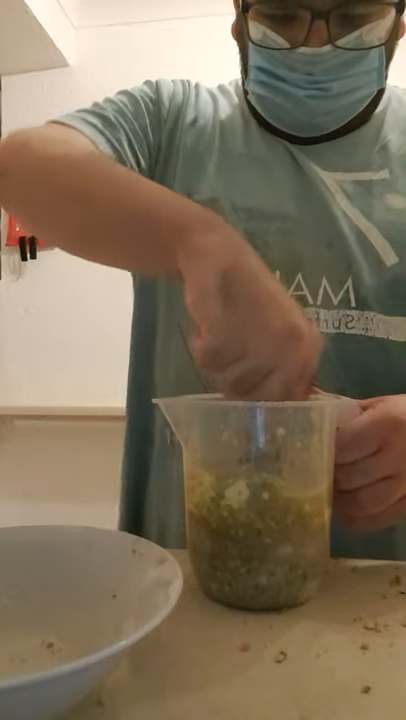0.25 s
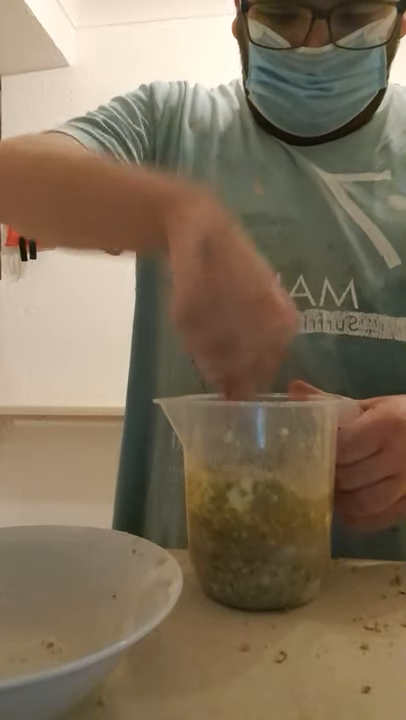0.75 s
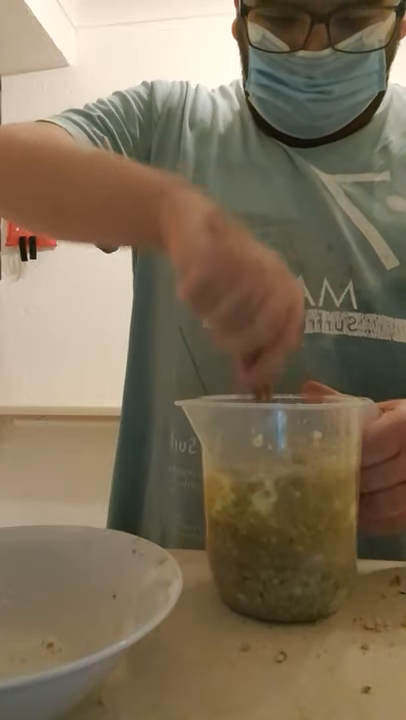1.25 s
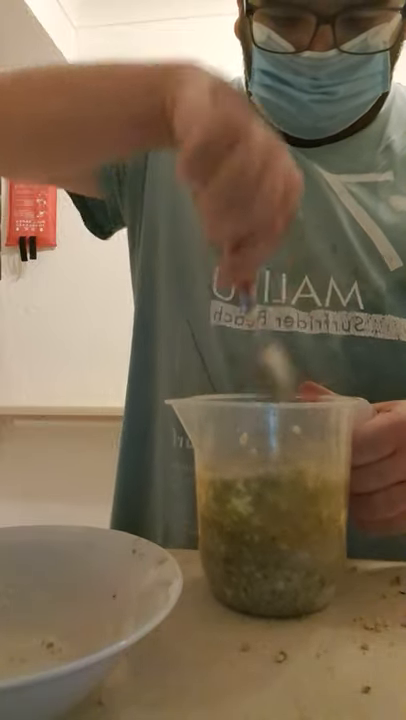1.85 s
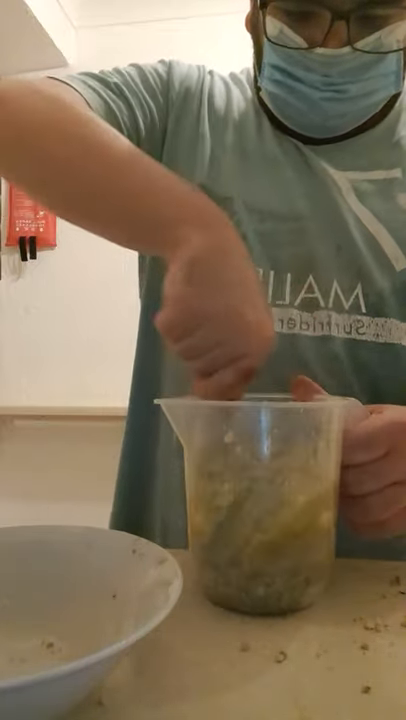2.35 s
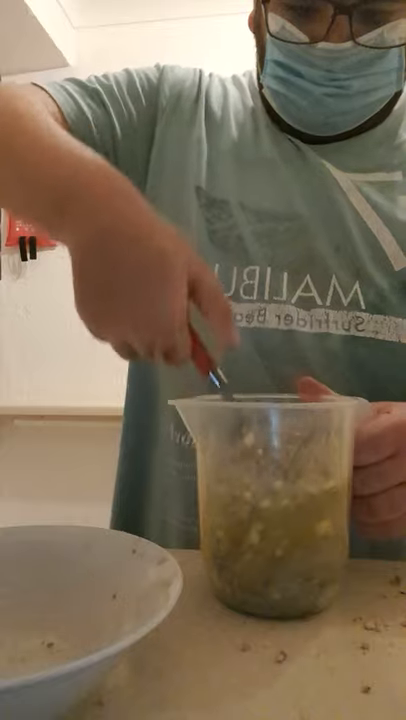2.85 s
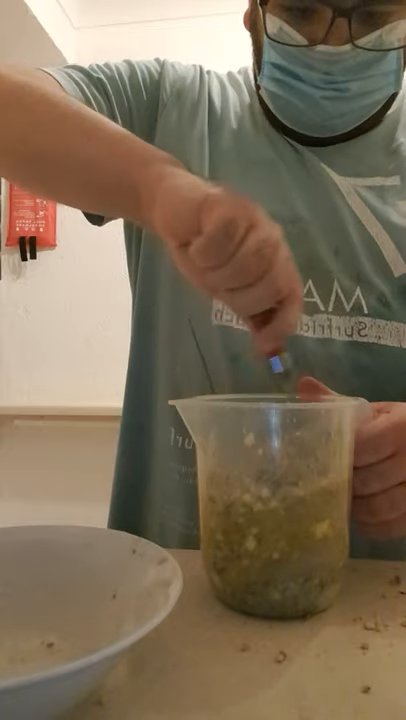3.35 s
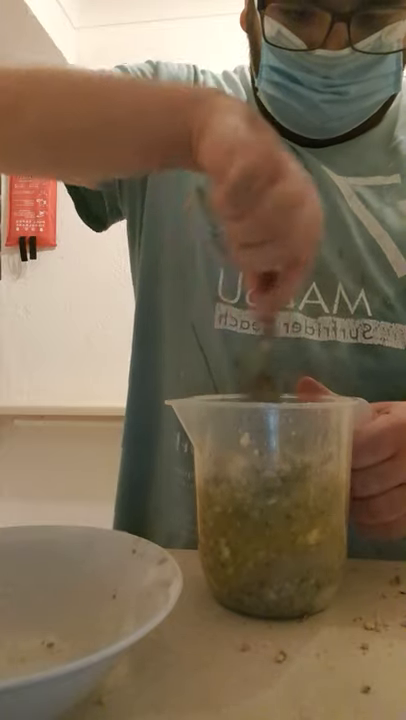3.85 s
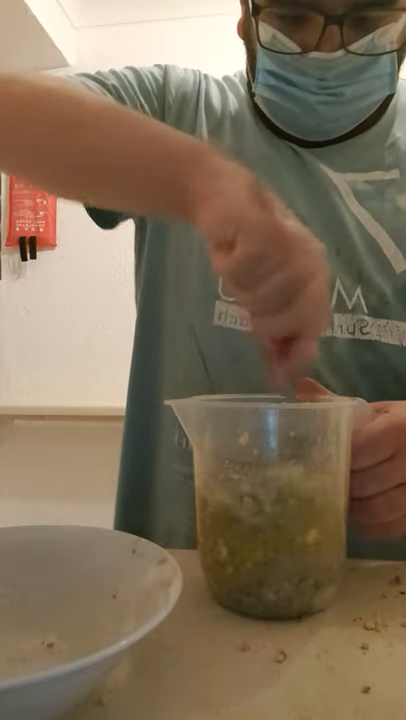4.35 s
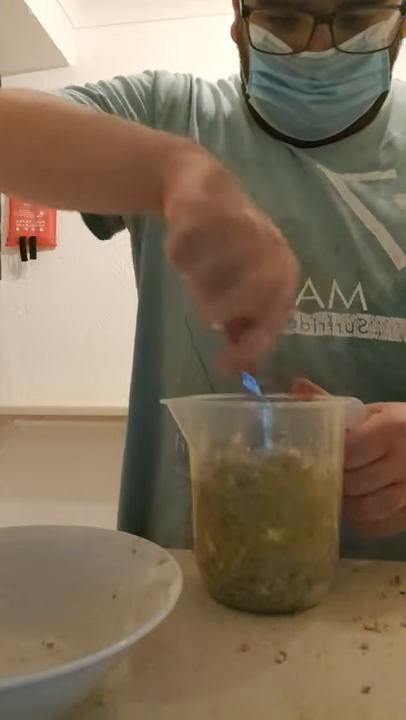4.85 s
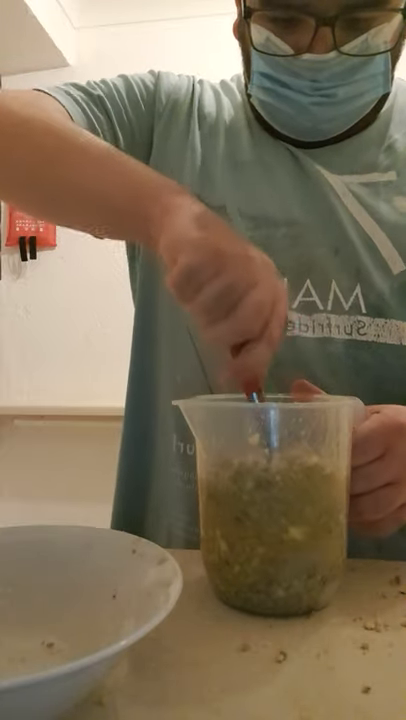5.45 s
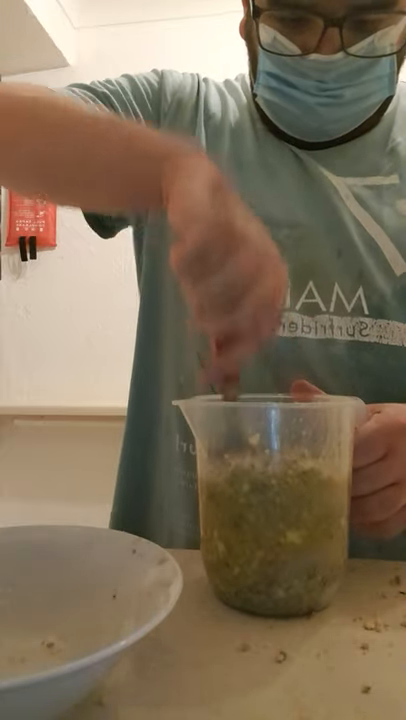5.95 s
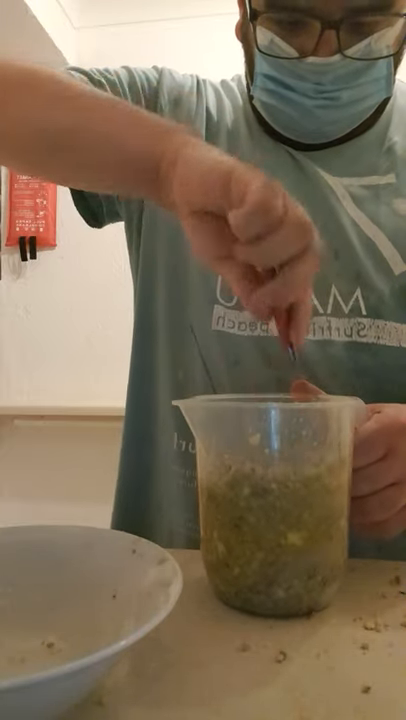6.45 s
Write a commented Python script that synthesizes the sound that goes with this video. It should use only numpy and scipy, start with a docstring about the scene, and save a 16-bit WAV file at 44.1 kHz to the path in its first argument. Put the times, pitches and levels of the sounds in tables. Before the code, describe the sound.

Close up, a metal spoon is driven four times into a wet, grainy mixture in a plastic jug, each plunge crunching and ending in a dull knock that booms the counter. Then it clatters and scrapes on the wall, pauses, and plunges four more times amid ticks and wet slips. Small reflective kitchen, low hum, faint hiss and thin whine behind.

```python
"""Crunching plunges and dull knocks: a metal spoon works a moist, grainy mixture in a plastic jug, close by.
Noise grits and impulses excite the jug ring; each plunge pushes in, crunches and sloshes on the way back.
Between plunges the spoon scrapes, ticks and taps the wall; blows also boom through the kitchen counter.
Near reflections and dense noise tails make the small hard room.
Behind lie a low hum of shaped noise and drones, faint hiss and the thin sine whine of an appliance."""
import sys
import numpy as np
from scipy import signal
from scipy.fft import rfft, irfft
from scipy.io import wavfile

SR = 44100
rng = np.random.default_rng(int(sys.argv[2]) if len(sys.argv) > 2 else 0)


def file_out(sig):
    """Save sig as 16-bit WAV at sys.argv[1]."""
    # one column per channel
    cols = np.atleast_2d(sig).T
    # limit, then scale
    lim = np.clip(cols, -1, 1)
    pcm = np.round(lim * 32767).astype(np.int16)
    wavfile.write(sys.argv[1], SR, pcm)


N = 295911
TIME = np.arange(N) / SR  # s

# Plunges through the mixture: (time at the height [s], crunch [dB], half length [s], treble [dB],
# strongest ring [Hz], slosh on the way back [dB])
PLUNGE_TABLE = [(0.224, -17.5, 0.0051, -4.5, 1270, -59), (.642, -30, 0.0048, -2, 1000, -60),
                (1.073, -26, 0.0063, -8.5, 1090, -50), (1.495, -18.5, 0.0039, -8.5, 1210, -54.5),
                (4.208, -26.5, 0.0052, -13, 958, -55.5), (4.703, -37, 0.0055, -7, 1120, -62),
                (5.161, -29.5, 0.0023, -12, 2250, -54), (5.662, -21, 0.0036, -11, 1361, -53)]
# Blows at the bottom, cushioned by the mixture: (time [s], strength [dB], counter thump [dB],
# room share [dB], corner of the soft blow [Hz], strongest ring [Hz])
KNOCK_TABLE = [(.222, 4, -21.5, 1.5, 764, 247), (0.2351, 2, -47, -4, 1020, 536),
               (.639, 6, -48, -21, 577, 277), (0.6425, 13.5, -15, -6.5, 977, 875),
               (1.071, -5, -26, -3.5, 1180, 418), (1.0995, 14, -21, -4, 1350, 566),
               (1.493, -2, -21, 0, 1345, 980), (4.708, 1.5, -31.5, -4.5, 2280, 735),
               (4.717, 0.5, -42, -20, 2120, 880), (5.1786, 14, -29.5, -1.5, 968, 627),
               (5.662, -3, -26.5, -0.5, 1390, 877)]
# Spoon on the bare wall: (time [s], strength [dB], treble [dB], counter thump [dB], strongest ring [Hz])
TAP_TABLE = [(1.099, -0.5, -11.5, -52, 1330), (1.444, -15.5, -14, -51, 1040), (2.0311, -1, -4, -46, 2794),
             (2.0642, -4, 0, -57, 2430), (2.076, -8, 2, -55, 2400), (2.094, -4, 6, -62, 4400),
             (2.105, 5, -7, -48, 3750), (2.128, -13, -5, -47, 2330), (2.148, -3.5, -21, -31, 2110),
             (2.28, -2.5, -8, -35.5, 2430), (2.331, -7.5, -26, -38, 880), (2.386, -8.5, -9, -54, 1006),
             (2.396, -6, -5.5, -50, 3150), (2.491, 2.5, -12.5, -53, 2660), (2.498, -4.5, -22, -50, 950),
             (2.5215, -3.5, -24, -56, 2600), (2.566, -7, -35, -37, 2270), (4.134, 1.5, -7.5, -41, 2840),
             (4.159, -9, -11, -40, 1198), (4.1728, -7, 4, -45, 2380), (4.183, -9, 7, -44, 2530),
             (4.357, 0, -14, -45, 850), (4.378, 2, -3.5, -39, 1060), (4.484, -7.5, -10, -41, 2670),
             (5.151, -7.5, -15, -30.5, 1000), (6.344, 1.5, -1, -34, 1110), (6.4224, -6.5, -1, -50, 2630)]
# Spoon drawn along the wall: (start [s], length [s], level [dB], treble [dB], strongest ring [Hz])
SCRAPE_TABLE = [(1.597, 0.021, -45, -20, 1000), (2.083, 0.12, -42, -10, 2164), (2.238, 0.23, -46, -12, 910),
                (2.486, 0.17, -46, -9.5, 970), (2.976, 0.15, -59, -5, 2325), (3.557, 0.029, -55, 12, 2500),
                (4.16, 0.13, -51.5, 10, 2490), (4.394, 0.068, -40.5, 3, 2430), (4.596, 0.12, -52, 7, 2473),
                (4.741, 0.084, -44, -1, 2600), (4.973, 0.2, -54, 7.5, 2480), (6.359, 0.12, -58, 0, 995),
                (6.488, 0.058, -46.5, -2, 2260)]
# Rings of the filled jug with the spoon in it: (frequency [Hz], width [Hz], relative level [dB])
JUG_MODES = [(309.4, 35, -7), (409.5, 108, -2), (806, 108, 1), (880, 265, -2.5), (1159, 140, 0.5),
             (1448, 120, -2.5), (1900, 124, -2), (2160, 200, 0), (2546, 170, -0.5), (2880, 210, -2),
             (3100, 950, -10.5), (4600, 210, -24), (5400, 1700, -16.5), (6280, 290, -9)]
# Dry snap of plastic between those rings: (frequency [Hz], relative level [dB])
PLASTIC_SNAP = [(25, -83), (150, -7.5), (550, -6), (1700, -47), (4000, -8.5), (7000, -14), (8000, -22),
                (12000, -14.5), (16000, -22.5)]
# Counter under the jug: (frequency [Hz], relative level [dB], t60 [s])
COUNTER_MODES = [(49.5, -10.5, 0.28), (91.7, -11.5, 0.25), (98.2, 4, 0.15), (143, -3.5, 0.12)]
# Reflections from counter, bowl and wall: (left delay [s], left gain [1], right delay [s], right gain [1])
NEAR_ECHOES = [(.0012, .5, 0.00092, 0.3), (.0033, 0.63, 0.003, 1), (.0052, .4, .0046, .25),
               (.0088, 0.17, 0.011, 0.24)]
# Shading of the left port against the right: (frequency [Hz], level [dB])
LEFT_SHADE = [(100, 7), (300, -13.5), (700, -12.5), (1200, -5.5), (2400, -9.5), (4000, -3), (6500, -12.5),
              (9000, 1), (15000, -7)]
# Room decay: (frequency [Hz], t60 [s])
ROOM_T60 = [(100, 0.53), (300, 0.49), (700, 0.45), (1800, 0.44), (5000, 0.4), (14000, 0.4)]
# Left-right likeness of diffuse sound: (frequency [Hz], likeness [1])
DIFFUSE_LIKENESS = [(60, 0.75), (130, 0.89), (290, 0.99), (640, 0.55), (1400, 0), (15000, 0.28)]
# Diffuse sound, left against right: (frequency [Hz], level [dB])
DIFFUSE_LEAN = [(60, -4), (200, 0), (380, -2.5), (700, -7.5), (2400, -7), (4400, -3), (8000, -5.5),
                (15000, 3)]
# Hum spectrum: (frequency [Hz], relative level [dB per Hz])
HUM_SPECTRUM = [(15, -65), (25, -35), (70, -6), (103, -10), (136, -3), (194, -9.5), (248, -6), (347, -2),
                (386, -13.5), (421, -9.5), (633, -20), (691, -25), (741, -12.5), (869, -20.5), (1700, -36),
                (2210, -71), (3740, -120)]
# Hiss spectrum: (frequency [Hz], relative level [dB per Hz])
HISS_SPECTRUM = [(900, -26), (1700, -3.5), (2600, 1), (3500, -9), (6800, -3), (7700, -18), (10000, -18.5),
                 (12500, -15.5), (16000, -20)]
# Wavering drone notes: (frequency [Hz], relative level [dB])
DRONE_NOTES = [(145.3, -55.5), (247.6, -53.5), (328.4, -56), (732.1, -69.5)]
# Whine lines at speed factor 1: (frequency [Hz], relative level [dB])
WHINE_LINES = [(3634, -81), (3865, -76.5), (4091, -78), (4770, -83), (5227, -77), (5959, -79), (6137, -81),
               (6412, -79), (6589, -73), (7095, -84), (7273, -87)]
# Appliance motor: (time [s], speed factor [1])
MOTOR_SPEED = [(0, 1.0135), (1.0, 1.013), (1.7, 1.0), (4.6, 1.0), (5.3, .9895), (6.71, .9895)]
# Swell and fade of the lowest whine lines: (time [s], gain [dB])
LOW_WHINE_FADE = [(0, 2.5), (.6, -0.5), (1.2, -3), (3, -0.5), (3.9, 2), (4.6, 5), (6.7, -12)]

CRUNCH_SKIRT_S, CRUNCH_SKIRT_DB = 0.021, -22.5  # weak, slower skirt of a crunch
PUSH_DB, PUSH_RISE_S, PUSH_HZ, PUSH_TREBLE_DB, PUSH_CORNER_HZ = -38.5, 0.026, 1040, 1, 1290
ENTRY_DB, ENTRY_RISE_S = -47, 0.024  # wet crackle as the spoon sinks in
LIFT_S, SLOSH_S = 0.14, 0.05  # delay of the slosh after a plunge; its half length
SCRAPE_ATTACK_S, SCRAPE_RELEASE_S = 0.011, 0.02
SMEAR_DB, SMEAR_RELEASE_S = -1.5, 0.054  # wet mixture dragged by a scrape settles more slowly
STIR_DB = -65  # gentle stirring between the strokes
RATTLE_PER_S, RATTLE_DB = 25, -7.5
HUM_DB, DRONE_TRIM_DB = -44.5, -2.0
BAND_EDGE_HZ = 16100


def amp(db):
    """Decibels to gain."""
    return 10 ** (np.asarray(db) / 20)


def unit(x):
    """Scales to rms 1."""
    return x / np.sqrt(np.mean(x ** 2) + 1e-20)


def read(points, hz):
    """Interpolates a table on a log-frequency axis."""
    f, value = np.transpose(points)
    return np.interp(np.log(hz + 1), np.log(f + 1), value)


def add(mix, s, sound):
    """Mixes a sound in at time s."""
    part = mix[max(round(s * SR), 0):][:len(sound)]
    part += sound[:len(part)]


def shaped(x, points):
    """Filters a full-length signal with a (frequency [Hz], level [dB]) table."""
    return irfft(rfft(x) * amp(read(points, np.fft.rfftfreq(N, 1 / SR))), N)


def wander(rate_hz):
    """Slow random motion of rms 1: noise under a Gaussian low-pass."""
    hz = np.fft.rfftfreq(N, 1 / SR)
    return unit(irfft(rfft(rng.standard_normal(N)) * np.exp(-(hz / rate_hz) ** 2), N))


def grit(length, per_s, spread_db):
    """Tiny slips of uneven size at random moments, rms 1."""
    size = amp(spread_db * np.minimum(rng.exponential(1, length), 4))
    happens = rng.random(length) < per_s / SR
    return unit(size * rng.standard_normal(length) * happens)


def jug_ring(spot_hz, spot_db, treble_db=0, corner_hz=None, spot_octaves=0.31, size=8192):
    """Causal jug response: each spot favours one ring; a cushioned blow excites mostly modes below its corner."""
    hz = np.fft.rfftfreq(size, 1 / SR) + 1
    power = amp(read(PLASTIC_SNAP, hz)) ** 2
    for f, width_hz, db in JUG_MODES:
        power = power + amp(db) ** 2 / (1 + ((hz - f) / width_hz * 2) ** 2) ** 1.62
    spot_gain_db = spot_db * np.exp(-(np.log2(hz / spot_hz) / spot_octaves) ** 2)
    treble_gain_db = read([(2500, 0), (9000, treble_db)], hz)
    power = power * amp(spot_gain_db + treble_gain_db) ** 2
    if corner_hz:
        power = power * (amp(-48) ** 2 + 1 / (1 + (hz / corner_hz) ** 6))
    # minimum phase from the log spectrum
    log_gain = np.log(np.r_[power, power[-2:0:-1]]) / 2
    causal = np.exp(np.conj(signal.hilbert(log_gain)))[:len(hz)]
    # bending waves in the wall carry the treble faster than the bass
    delay_s = 0.0008 / np.sqrt(1 + hz / 2500)
    phase = -2 * np.pi * np.cumsum(delay_s) * SR / size
    ring = irfft(causal * np.exp(1j * phase))[:size // 2]
    return -ring / np.linalg.norm(ring)


def plunges(spot_db=8):
    """A muffled push builds up, then a dense crunch swells and dies as the spoon presses through the grains."""
    out, t = np.zeros(N), np.arange(-SR // 10, SR // 10) / SR
    push = amp(PUSH_DB) * np.exp(-abs(t) / PUSH_RISE_S) * (t < 0)
    muffled = jug_ring(PUSH_HZ, spot_db, PUSH_TREBLE_DB, corner_hz=PUSH_CORNER_HZ)
    for s, db, half_s, treble_db, spot_hz, _ in PLUNGE_TABLE:
        skirt = amp(CRUNCH_SKIRT_DB) * np.exp(-abs(t) / CRUNCH_SKIRT_S)
        crunch = amp(db) * (np.exp(-abs(t) / half_s) + skirt)
        bright = jug_ring(spot_hz, spot_db, treble_db)
        for swell, ring in (push, muffled), (crunch, bright):
            force = swell * grit(len(t), per_s=3500, spread_db=2.5)
            add(out, s + t[0], signal.fftconvolve(force, ring))
    return out


def knocks(spot_db=6):
    """Dull cushioned blows at the bottom: returns the near sound and the share thrown into the room."""
    near, far = np.zeros(N), np.zeros(N)
    for s, db, _, room_db, corner_hz, spot_hz in KNOCK_TABLE:
        blow = amp(db) * jug_ring(spot_hz, spot_db, corner_hz=corner_hz)
        add(near, s, blow)
        add(far, s, amp(room_db) * blow)
    return near, far


def taps(chatter_s=0.0019, spot_db=8):
    """Sharp hits; the spoon chatters on the wall for a few milliseconds after each."""
    out, t = np.zeros(N), TIME[:SR // 30]
    for s, db, treble_db, _, spot_hz in TAP_TABLE:
        force = 0.16 * rng.standard_normal(len(t)) * np.exp(-t / chatter_s)
        force[0] = 1
        force = force / np.linalg.norm(force)
        ring = jug_ring(spot_hz, spot_db, treble_db)
        add(out, s, amp(db) * signal.fftconvolve(force, ring))
    return out


def stroke(t, length_s, release_s):
    """Attack, hold and release of one scrape."""
    return np.clip(t / SCRAPE_ATTACK_S, 0, 1) * np.exp(-np.maximum(t - length_s, 0) / release_s)


def scrapes(spot_db=8, clump_db=8):
    """The spoon edge grinds grains against one spot of the wall, in uneven clumps."""
    out, t = np.zeros(N), TIME[:SR // 2]
    clumps = unit(amp(clump_db * np.tanh(wander(rate_hz=42))))
    force = grit(N, per_s=900, spread_db=4.0) * clumps
    for s, length_s, db, treble_db, spot_hz in SCRAPE_TABLE:
        grind = force[round(s * SR):][:len(t)]
        grind = grind * stroke(t[:len(grind)], length_s, SCRAPE_RELEASE_S)
        add(out, s, amp(db) * signal.fftconvolve(grind, jug_ring(spot_hz, spot_db, treble_db)))
    return out


def effort():
    """How hard the mixture is worked: stirring, entry and slosh of each plunge, smear of each scrape, power-summed."""
    power = np.full(N, amp(STIR_DB) ** 2)
    for s, *_, slosh_db in PLUNGE_TABLE:
        power += (amp(ENTRY_DB) * np.exp(-abs(TIME - s) / ENTRY_RISE_S) * (TIME < s)) ** 2
        power += amp(slosh_db) ** 2 * np.exp(-((TIME - s - LIFT_S) / SLOSH_S) ** 2)
    for s, length_s, db, *_ in SCRAPE_TABLE:
        power += (amp(db + SMEAR_DB) * stroke(TIME - s, length_s, SMEAR_RELEASE_S)) ** 2
    return np.sqrt(power)


def drag(pressure, treble_db=0, spot_db=11, count=7):
    """Wet grains stick and slip in clumps at several spots of the wall, and air pockets pop."""
    slip = np.zeros(N)
    for spot_hz in np.geomspace(900, 3300, count):
        clumps = unit(amp(14 * np.tanh(wander(rate_hz=55) - 1)))
        force = grit(N, per_s=2500, spread_db=2.5) * clumps * pressure
        slip += signal.oaconvolve(force, jug_ring(spot_hz, spot_db, treble_db))[:N] / np.sqrt(count)
    return slip + amp(-5) * pops(pressure)


def pops(pressure, per_s=110, cycles=7, count=24):
    """Air pockets in the wet mixture burst as tiny rising chirps of many pitches."""
    out = np.zeros(N)
    for hz in np.geomspace(850, 4200, count):
        age = TIME[:SR // 30] * hz / cycles  # in decay times
        chirp = np.exp(-age) * np.sin(2 * np.pi * cycles * age * (1 + 0.044 * age))
        for at, size in rng.random((round(per_s * N / SR / count), 2)):
            add(out, at * N / SR, pressure[int(at * N)] * amp(13.3 * size ** 2) * chirp)
    return out


def rattle(pressure, treble_db=-3, spot_db=10, spread_db=8, count=4):
    """The spoon skips over grains and ticks at random spots of the wall, louder the harder it rubs."""
    out = np.zeros(N)
    for spot_hz in np.geomspace(1000, 3000, count):
        at, size = rng.random((2, round(RATTLE_PER_S * N / SR / count)))
        force = np.zeros(N)
        force[(at * N).astype(int)] = amp(spread_db * size)
        out += signal.oaconvolve(unit(force) * pressure, jug_ring(spot_hz, spot_db, treble_db))[:N]
    return amp(RATTLE_DB) * out / np.sqrt(count)


def thumps(pressure, rise_s=0.0041, rub_db=-7):
    """Every blow pushes through the jug into the counter, which booms briefly; rubbing makes it rumble."""
    out, t = np.zeros(N), TIME[:SR // 2]
    boom = -sum(amp(db - 60 * t / t60_s) * np.sin(2 * np.pi * hz * t) for hz, db, t60_s in COUNTER_MODES)
    boom = boom * (1 - np.exp(-t / rise_s))
    for s, _, db, *_ in KNOCK_TABLE:
        add(out, s, amp(db) * boom)
    for s, _, _, db, _ in TAP_TABLE:
        add(out, s, amp(db) * boom)
    rub = pressure * rng.standard_normal(N)
    out += amp(rub_db) * signal.oaconvolve(rub, boom / np.linalg.norm(boom))[:N]
    return signal.sosfilt(signal.butter(3, 48, "high", fs=SR, output="sos"), out)


def ports(x, lag_s=0.00014):
    """Each microphone port hears direct sound and near reflections; the left is farther and shaded."""
    left, right = np.zeros(N), x.copy()
    add(left, lag_s, x)
    for left_s, left_gain, right_s, right_gain in NEAR_ECHOES:
        add(left, left_s, left_gain * x)
        add(right, right_s, right_gain * x)
    return np.array([shaped(left, LEFT_SHADE), right])


def pair(a, b, likeness=1):
    """Mixes two unrelated signals into a diffuse stereo field, alike in the bass and leaning right."""
    hz = np.fft.rfftfreq(len(a), 1 / SR)
    same = np.clip(likeness * read(DIFFUSE_LIKENESS, hz), -1, 1)
    left = same * rfft(a) + np.sqrt(1 - same ** 2) * rfft(b)
    return np.array([irfft(left * amp(read(DIFFUSE_LEAN, hz)), len(a)), a])


def kitchen(x, build_s=0.0058, likeness=1.0, count=5):
    """Five dense noise tails, dying sooner in the treble, take turns, each crossfading into the next."""
    out = np.zeros((2, N))
    for k in range(count):
        noise = pair(*rng.standard_normal((2, SR)), likeness)
        hz, t, z = signal.stft(noise, SR, nperseg=256)
        decay = amp(-60 * t / read(ROOM_T60, hz)[:, None])
        tail = signal.istft(z * decay, SR, nperseg=256)[1][:, :SR]
        tail = tail * (1 - np.exp(-(TIME[:SR] / build_s) ** 2))
        tail = tail / np.linalg.norm(tail[1])
        share = np.sin(np.pi / 2 * np.minimum((10 * TIME - k) % count, 2))  # a new tail every 0.1 s
        out += signal.fftconvolve((share * x)[None], tail, axes=1)[:, :N]
    return out


def background(hiss_db=-61.0):
    """Low fan noise and faint hiss from shaped noise, with drone notes wavering in amplitude and phase."""
    air = []
    for a, b in rng.standard_normal((2, 2, N)):
        hum = amp(HUM_DB) * unit(shaped(a, HUM_SPECTRUM))
        hiss = amp(hiss_db) * unit(shaped(b, HISS_SPECTRUM))
        air.append(hum + hiss)
    drone = np.zeros(N)
    for hz, db in DRONE_NOTES:
        slow = wander(rate_hz=3.3) * np.sin(2 * np.pi * hz * TIME)
        fast = wander(rate_hz=11.3) * np.cos(2 * np.pi * hz * TIME)
        drone += amp(db) * (slow + fast)
    return pair(*air) + amp(DRONE_TRIM_DB) * drone


def whine():
    """Thin tones of an appliance motor sink as it slows; at full speed the lowest meets a casing resonance."""
    speed = np.interp(TIME, *np.transpose(MOTOR_SPEED))
    turns = np.cumsum(speed) / SR
    fade_db = np.interp(TIME, *np.transpose(LOW_WHINE_FADE))
    out = np.zeros((2, N))
    for hz, db in WHINE_LINES:
        casing_db = 11 * np.exp(-((hz * speed - 3685) / 30) ** 2)
        level_db = db + 3.5 + 2 * wander(rate_hz=4) + casing_db + fade_db * (hz < 4200)
        start_turn = rng.random((2, 1)) / 2  # per channel
        out += amp(level_db) * np.sin(2 * np.pi * (hz * turns + start_turn))
    return out * amp([[-2], [2]])  # leans right


def scene(tap_room_db=-5.0, plunge_room_db=-8, scrape_room_db=-8, thump_room_db=-7):
    """Sums jug, counter, room and background."""
    pressure = effort()
    knock, far = knocks()
    tap, plunge, thump = taps(), plunges(), thumps(pressure)
    scrape = scrapes() + drag(pressure) + rattle(pressure)
    far = far + amp(tap_room_db) * tap + amp(plunge_room_db) * plunge
    far = far + amp(scrape_room_db) * scrape + amp(thump_room_db) * thump
    near = ports(knock + tap + plunge + scrape) + thump * amp([[-1], [0.5]])
    return near + kitchen(far) + background() + whine()


def record(dry):
    """Applies the microphone's low cut, the full-scale ceiling, then the band limit."""
    thinned = signal.sosfilt(signal.butter(2, 35, "high", fs=SR, output="sos"), dry)
    band = signal.firwin(511, BAND_EDGE_HZ, window=("kaiser", 9), fs=SR)
    return signal.oaconvolve(np.clip(thinned, -1, 1), band[None], "same")


dry = scene()
out = record(dry)
file_out(out)
```